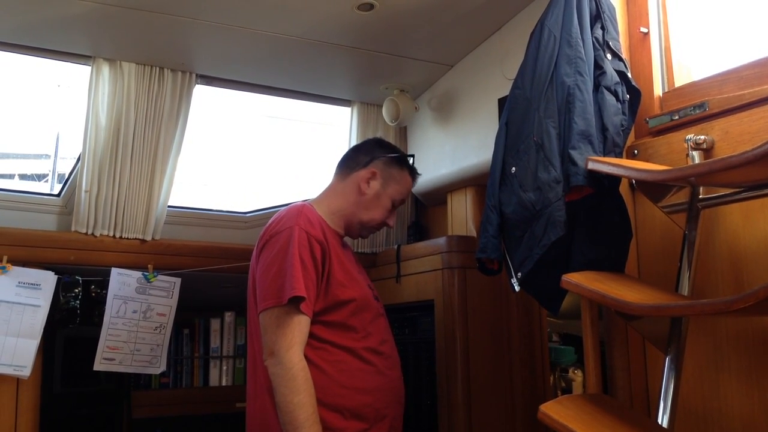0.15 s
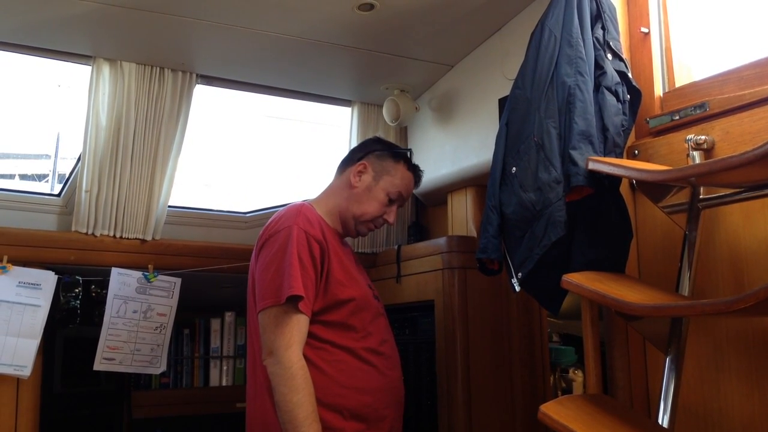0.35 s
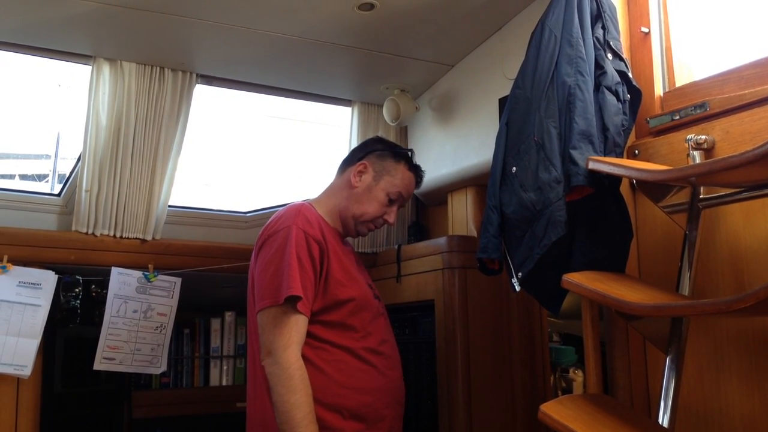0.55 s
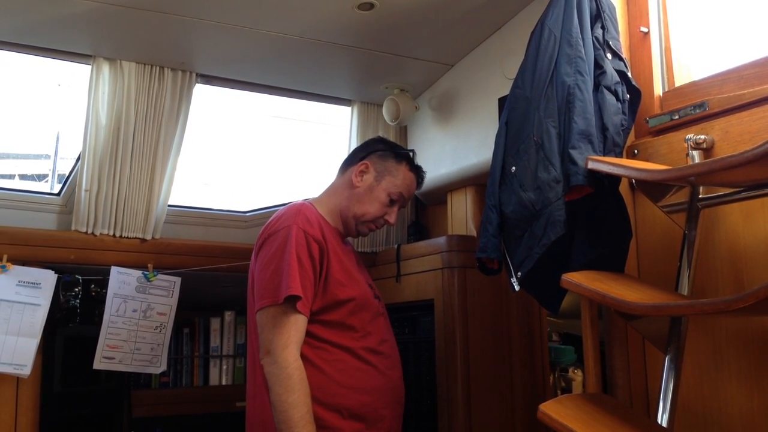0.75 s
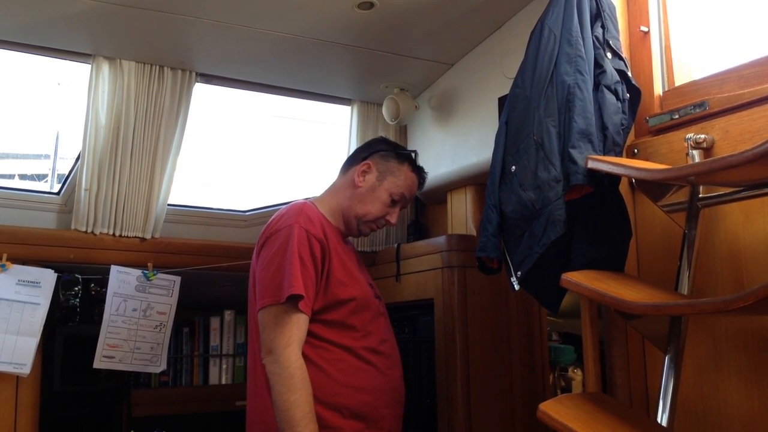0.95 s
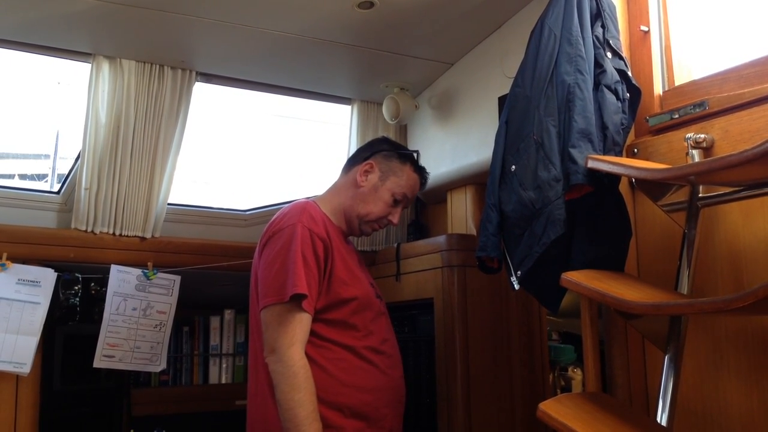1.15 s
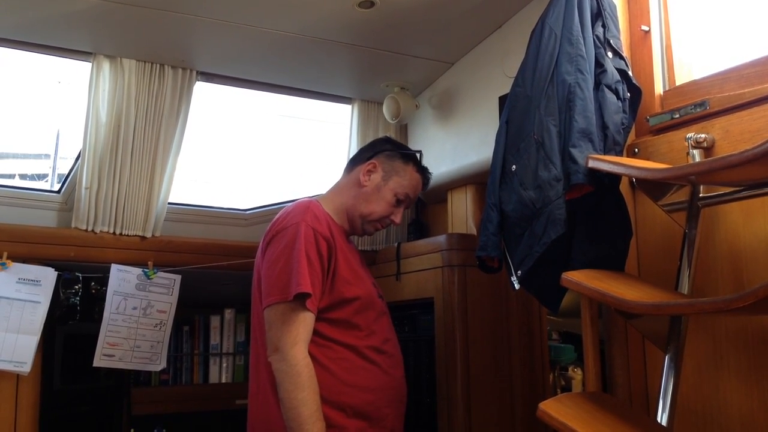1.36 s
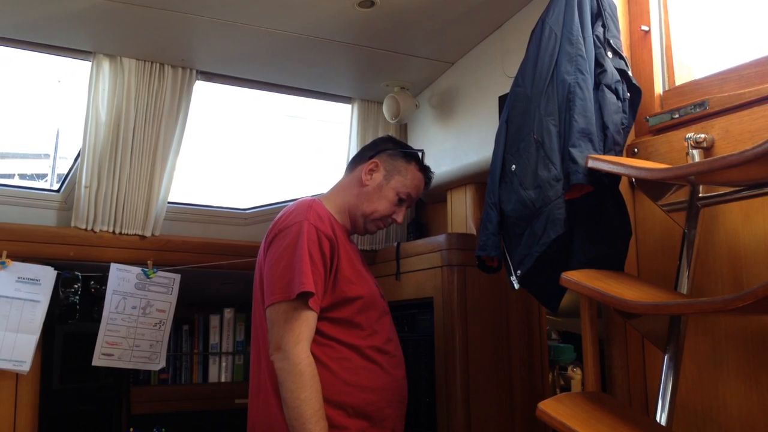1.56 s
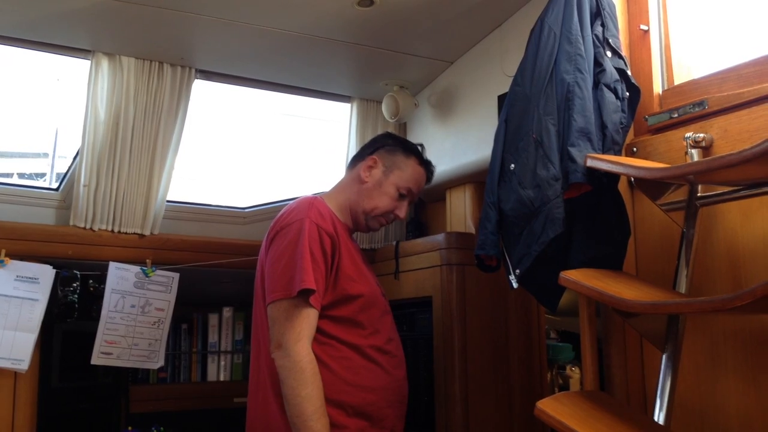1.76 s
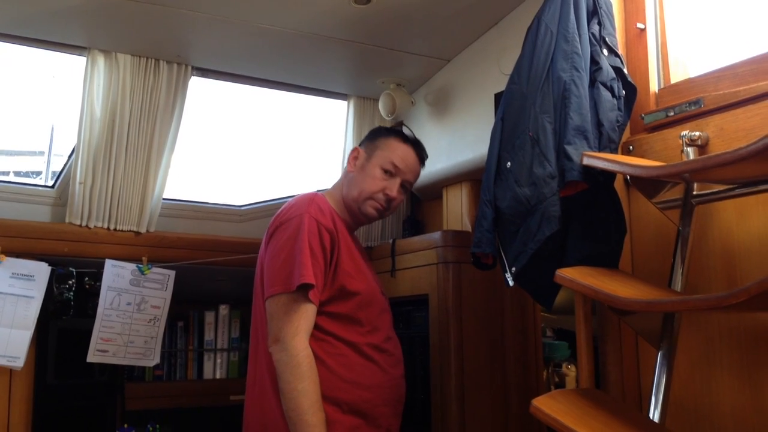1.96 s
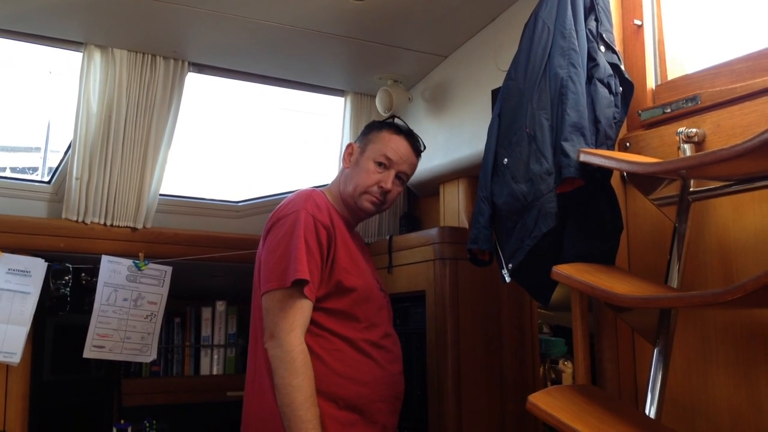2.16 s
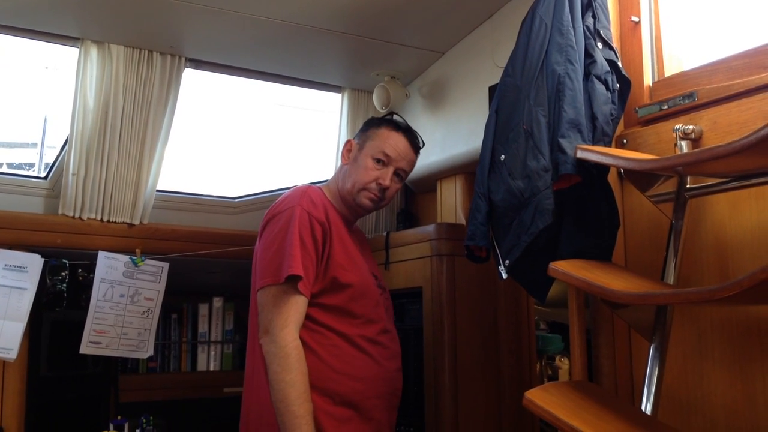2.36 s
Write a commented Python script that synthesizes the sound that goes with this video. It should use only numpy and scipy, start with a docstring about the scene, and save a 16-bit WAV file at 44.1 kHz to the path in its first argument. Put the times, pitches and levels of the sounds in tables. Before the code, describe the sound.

A boat's electric starter winds up and chatters with fast metallic clacks, failing to catch.

```python
"""A starter motor fails to catch.

One microphone inside a small wooden cabin, near enough for the direct sound to lead the echoes.
A switch clicks, a relay snaps, the pinion slams in and the motor winds up with a rough whine.
Then the pinion chatters against the gear ring, each blow ringing the metal and thudding in the hull,
until it is let go and coasts out with a faint hiss. A low lumpy rumble lies under it all."""
import sys
import numpy as np
from scipy import signal
from scipy.fft import rfft, irfft
from scipy.io import wavfile
from scipy.ndimage import uniform_filter1d

SR = 44100
rng = np.random.default_rng(int(sys.argv[2]) if len(sys.argv) > 2 else 0)


def to_wav(s):
    """Save 16-bit WAV."""
    ch = np.atleast_2d(s).T  # columns
    pcm = np.round(np.clip(ch, -1, 1) * 32767)  # PCM
    wavfile.write(sys.argv[1], SR, pcm.astype(np.int16))


N = 105840

# Spectra of the hull's rumble, the soft mid noise above it and the coasting pinion's hiss.
# Each row: frequency in Hz, relative level in dB.
RUMBLE_COLOUR = [(18, -33), (30, -4), (64, 5.5), (172, 2.5), (211, 4.5), (344, -24), (400, -34),
                 (520, -62.5), (880, -120)]
AIR_COLOUR = [(150, -45), (250, -24), (346, -4), (473, -18.5), (678, -16), (4000, -39), (5200, -69),
              (8800, -120)]
COAST_COLOUR = [(530, -37), (900, -1), (1050, -8), (1300, -3), (1980, -11), (2330, -3), (2790, -8.5),
                (3800, 0), (6650, -11), (12100, -12), (15500, -13.5)]
# Loudness of the mid noise and of the coasting hiss. Each row: time in seconds, level in dB.
AIR_LEVEL = [(0, -66.5), (.2, -58.5), (1.9, -61), (2.1, -64.5), (2.16, -62), (2.4, -64)]
COAST_LEVEL = [(1.74, -35), (1.784, -47), (1.892, -54), (1.99, -85)]
# The cabin's echo. Each row: frequency in Hz, seconds to fall 60 dB.
CABIN_DECAY = [(300, 0.41), (1000, 0.12), (4000, 0.037), (12000, 0.058)]
# The switch. Each row: time in seconds, relative level in dB, ring in Hz, low knock in dB.
SWITCH_CLICKS = [(0.0084, -40.5, 4830, -52.5), (0.064, -40.5, 3820, -53), (0.115, -41.5, 3730, -54),
                 (0.1697, -33.5, 3800, -53.5)]
# The whine's tones. Each row: multiple of the base pitch, width of its fuzz in Hz.
WHINE_ORDERS = [(0.998, 16), (1.64, 18.4), (3.01, 90)]
# The wind-up. Each row: time in seconds, base pitch in Hz, then the level of each tone in dB.
WIND_UP = [(0.339, 923, -44, -37, -57.5), (.41, 956, -31.5, -44, -80), (.46, 1010, -55, -55, -51),
           (.53, 1157, -67, -34, -42), (.575, 1145, -40, -49, -32.5), (.63, 1119, -39.5, -42, -27),
           (.665, 1117, -29, -27.5, -44), (.7, 1090, -42, -39, -43)]
# The motor's run. Each row: time in seconds, gain in dB, load from 0 (winding up) to 1 (chattering).
MOTOR_RUN = [(.2, -52, 0), (.23, -20, 0.86), (.3, -27, 0.67), (.39, -34.5, 0.055), (.47, -30, 0.18),
             (.58, -28, 0.19), (.67, -28.5, 0.28), (.74, -30, 0.53), (.8, -25.5, 0.9), (1.0, -27.5, 0.89),
             (1.35, -28, 0.91), (1.7, -27, 1), (1.73, -31, 0.76), (1.78, -61, 1)]
# Resonances of the motor housing. Each row: frequency in Hz, width in Hz, relative level in dB.
HOUSING_HUMS = [(628, 49, -19), (716.3, 54, -17), (975, 90, -24), (2100, 70, -24), (2304, 60, -26),
                (2630, 40, -22), (3000, 40, -27), (3255, 160, -19.5), (3780, 200, -15)]
# Spectra of the motor winding up, the motor under load and the crack of a blow.
# Each row: frequency in Hz, relative level in dB.
WINDING_COLOUR = [(240, -49.5), (400, -16.5), (560, -30), (705, -3), (784, -9), (1130, -5.5), (1260, -5.5),
                  (2800, -6.5), (3460, -6), (8530, -22.5), (11200, -14), (15500, -46.5)]
LOADED_COLOUR = [(180, -29), (300, -4), (476, -13), (720, -3), (1030, -10.5), (1700, -10), (2300, -5),
                 (2800, -8.5), (3340, -2.5), (5000, -5), (5800, -8.5), (7800, -4), (10100, -16.5),
                 (11700, -12.5), (15500, -19.5)]
CRACK_COLOUR = [(300, -31), (800, -11.5), (1500, -11), (2500, -4), (4300, -0.5), (5700, -6.5), (7800, -7),
                (10000, -13), (12000, -11), (15500, -19.5)]
# Parts that ring when struck; the rebound is the casing under a lighter second touch.
# Each row: frequency in Hz, relative level in dB, seconds to fall 60 dB.
HULL_MODES = [(166.9, -9, 0.28), (207.4, 1.5, 0.086), (350, -6.5, 0.25)]
RELAY_MODES = [(1743, -8.5, 0.018), (3026, -8, 0.0056), (4100, -8.5, 0.007), (6008, 3, 0.0065)]
CASING_MODES = [(2148, 8, 0.036), (2293, 4, 0.061), (2445, -4, 0.068), (2618, -2.5, 0.078)]
REBOUND_MODES = [(2324, 2, 0.072), (2600, -5.5, 0.022), (3260, 1.5, 0.014), (3645, -2.5, 0.018)]
BLOCK_MODES = [(727, -6.5, 0.035), (980, -5.5, 0.034), (1208, -8.5, 0.036), (1558, 3.5, 0.043),
               (1780, 2.5, 0.027), (1877, 6.5, 0.02)]
TOOTH_MODES = [(3318, -3, 0.055), (3480, -13.5, 0.045), (3684, -2.5, 0.03), (3890, -5, 0.045),
               (4390, -6, 0.024), (4680, -5, 0.019), (4940, -5.5, 0.028), (5220, -6, 0.043),
               (6650, -3.5, 0.031), (7570, -5.5, 0.025), (8830, -3, 0.022)]
# The pinion's blows. Each row: time in seconds, then relative levels in dB of the crack, the casing,
# the teeth and the block (these two added to the crack's), and the hull thud.
PINION_BLOWS = [(0.2152, -16, -18, -11, -16, -56), (0.2265, -10, -6.5, -13, -45, -40),
                (0.2605, 0, -18, -22, -7, -29.5), (0.3223, -8, -10.5, -28, -13, -32.5),
                (0.7088, -8.5, -14.5, -19, -6, -36.5), (0.7557, -6, -7, -21, -50, -32),
                (0.797, -5, -15, -29, -12.5, -31), (0.832, -12, -7.5, -13, -35, -32),
                (0.867, -6, -14.5, -13, -14, -32), (0.9079, -4, -10, -17, -14.5, -29.5),
                (0.945, -3.5, -11, -32, -17, -36.5), (0.9838, -12.5, -13.5, -2.5, -9.5, -31),
                (1.0188, -13.5, -21, 0.5, -27, -32), (1.056, -11, -12, -5.5, -35, -34.5),
                (1.0954, -7.5, -11, -30, -17, -33.5), (1.1336, -10.5, -18, -3, -12.5, -34.5),
                (1.1688, -8, -21, -10.5, -15, -32), (1.206, -14.5, -15.5, 2.5, -25, -35.5),
                (1.245, -10.5, -19.5, -3, -25, -32.5), (1.2817, -10, -17, -8, -27, -32.5),
                (1.3178, -15.5, -21, 2.5, -12, -33), (1.3555, -15, -14.5, 1.5, -14, -34),
                (1.3929, -7, -20, -18, -19.5, -33), (1.4311, -7, -21, -8, -15, -33.5),
                (1.4677, -14, -18, 0.5, -15.5, -30.5), (1.5028, -8, -22.5, -37, -13, -39),
                (1.5392, -14.5, -19, -1, -12.5, -32), (1.58, -9.5, -16.5, -8, -35, -30.5),
                (1.6121, -11, -17.5, -2.5, -11, -32), (1.6499, -12.5, -18, -1.5, -34.5, -33),
                (1.686, -10.5, -16, -2, -37, -29)]


def amp(db):
    """Decibels to gain."""
    return 10 ** (np.asarray(db) / 20)


def unit_rms(x):
    """Scales to rms 1."""
    return x / np.sqrt(np.mean(x ** 2) + 1e-20)


def at_hz(points, hz):
    """Reads a table on a log-frequency axis."""
    f, value = np.transpose(points)
    return np.interp(np.log(hz + 1), np.log(f + 1), value)


def track(rows, column=1):
    """One column of a time table, at every sample."""
    rows = np.array(rows)
    return np.interp(np.arange(N) / SR, rows[:, 0], rows[:, column])


def gate(rows, fade_s):
    """Fades in from a table's first time and out to its last."""
    t = np.arange(N) / SR
    return np.clip(np.minimum(t - rows[0][0], rows[-1][0] - t) / fade_s, 0, 1)


def highpass(x, hz):
    """Steep bass cut."""
    return signal.sosfilt(signal.butter(4, hz, "high", fs=SR, output="sos"), x)


def coloured(x, points):
    """Gives a signal a spectrum; rms 1."""
    gain = amp(at_hz(points, np.fft.rfftfreq(N, 1 / SR)))
    return unit_rms(irfft(rfft(x) * gain, N))


def grit(per_s, spread_db):
    """Tiny random contacts of uneven size and sign; rms 1."""
    size = amp(spread_db * np.minimum(rng.exponential(1, N), 5)) * rng.choice([-1., 1.], N)
    return unit_rms(size * (rng.random(N) < per_s / SR))


def resonate(x, hz, width_hz):
    """A resonance of gain 1 that can follow a pitch curve."""
    turn = np.exp(2j * np.pi * np.cumsum(hz * np.ones(N)) / SR)
    pole = np.exp(-np.pi * width_hz / SR)
    return 2 * (turn * signal.lfilter([1 - pole], [1, -pole], x / turn)).real


def strikes(times, levels_db):
    """One impulse at each time."""
    train = np.zeros(N)
    train[np.round(np.array(times) * SR).astype(int)] = amp(levels_db)
    return train


def bursts(times, levels_db, rise_s, t60):
    """Envelope with a quick rise and a decay at each time."""
    t = np.arange(SR // 4) / SR
    shape = np.minimum(t / rise_s, 1) * amp(-60 * t / t60)
    return np.abs(signal.fftconvolve(strikes(times, levels_db), shape)[:N])


def ring(x, modes, swell_s=1e-4):
    """Drives a set of dying modes."""
    t = np.arange(SR // 4) / SR
    tap = sum(amp(db - 60 * t / t60) * np.sin(2 * np.pi * hz * t) for hz, db, t60 in modes)
    return signal.fftconvolve(x, tap * np.minimum(t / swell_s, 1))[:N]


def rumble():
    """The room tone: low lumpy noise of the hull, soft mid noise and a thin hiss."""
    lump = int(0.013 * SR)
    lumps_db = unit_rms(uniform_filter1d(uniform_filter1d(rng.standard_normal(N), lump), lump))
    low = unit_rms(coloured(rng.standard_normal(N), RUMBLE_COLOUR) * amp(lumps_db))
    air = amp(track(AIR_LEVEL) + lumps_db) * coloured(rng.standard_normal(N), AIR_COLOUR)
    hiss = signal.lfilter([.6], [1, -.4], rng.standard_normal(N))
    return amp(-51.5) * low + air + amp(-69) * hiss


def cabin(x):
    """The direct sound plus sparse echoes off the wooden walls, each band dying at its own speed."""
    taps = np.zeros(SR // 2)
    slots = np.arange(130, SR // 2 - 20, 20)
    taps[slots + rng.integers(0, 20, len(slots))] = rng.choice([-1., 1.], len(slots))
    hz, t, bands = signal.stft(taps, SR, nperseg=256)
    decay = amp(-60 * t / at_hz(CABIN_DECAY, hz)[:, None])
    tail = signal.istft(bands * decay, SR, nperseg=256)[1]
    echoes = signal.fftconvolve(x, tail / np.linalg.norm(tail))[:N]
    return x + amp(-6) * highpass(echoes, 601)


def mount_boom():
    """The mounts take the hardest slam with a slow low boom."""
    hz, db, t60 = 109, -29, .3
    return ring(strikes([.262], [0]), [(hz, db, t60)], swell_s=.03)


def hull_thuds():
    """Each blow reaches the hull as a soft push and sets its low panels humming."""
    push_s, lead_s = 0.0016, 0.0037
    times, thud_db = np.transpose(PINION_BLOWS)[[0, -1]]
    push = np.hanning(int(push_s * SR) + 3)
    pushes = signal.fftconvolve(strikes(times - lead_s, thud_db), push / push.sum())[:N]
    return highpass(ring(pushes, HULL_MODES), 124)


def pinion_coast():
    """A faint hiss while the freed pinion spins down."""
    hiss = coloured(rng.standard_normal(N), COAST_COLOUR)
    return gate(COAST_LEVEL, fade_s=0.022) * amp(track(COAST_LEVEL)) * hiss


def switch_clicks():
    """The switch makes small bright clicks, each with its own short ring and a low knock."""
    knock_mode = (527, 3, .08)  # Hz, dB, seconds to fall 60 dB
    bright_noise = signal.lfilter([1, -.5], [1], rng.standard_normal(N))
    out = np.zeros(N)
    for s, db, ring_hz, knock_db in SWITCH_CLICKS:
        puff = bursts([s - .002], [db - 20], rise_s=0.0079, t60=0.08) * bright_noise
        out += puff + 2 * amp(13) * resonate(puff, ring_hz, width_hz=440)
        out += ring(strikes([s], [knock_db]), [knock_mode])
    return out


def relay():
    """The relay snaps shut and its contacts ring briefly."""
    snap = bursts([0.1875], [0], rise_s=0.011, t60=.04) * rng.standard_normal(N)
    return amp(-30) * ring(snap, RELAY_MODES) + amp(-21) * highpass(snap, 1400)


def motor_whine(clean_share=0.73):
    """Motor tones, part clean and part fuzzy, that climb as it winds up and then sag a little."""
    pitch_hz = track(WIND_UP)
    turns = np.cumsum(pitch_hz) / SR
    out = np.zeros(N)
    for i, (order, width_hz) in enumerate(WHINE_ORDERS):
        tone = np.sqrt(2) * np.sin(2 * np.pi * order * turns)
        fuzz = unit_rms(resonate(rng.standard_normal(N), order * pitch_hz, width_hz))
        out += amp(track(WIND_UP, column=2 + i)) * (clean_share * tone + (1 - clean_share) * fuzz)
    return gate(WIND_UP, fade_s=0.0089) * out


def motor_grind(grit_share=0.36):
    """Brush and gear grit heard through the housing; load shifts the colour and adds a high sizzle."""
    load = track(MOTOR_RUN, column=2)
    drive = grit_share * grit(per_s=6000, spread_db=4.5) + (1 - grit_share) * rng.standard_normal(N)
    body = (1 - load) * coloured(drive, WINDING_COLOUR) + load * coloured(drive, LOADED_COLOUR)
    hums = sum(amp(db) * unit_rms(resonate(drive, hz, width)) for hz, width, db in HOUSING_HUMS)
    sizzle = amp(-16) * unit_rms(resonate(drive, hz=11780, width_hz=130))
    body += (0.32 + 0.55 * load) * hums + load ** 2 * sizzle
    return gate(MOTOR_RUN, fade_s=0.0068) * amp(track(MOTOR_RUN)) * highpass(body, 250)


def casing_clanks():
    """Each blow knocks the starter casing once, then touches it again more lightly."""
    swell_s, rebound_s = 0.0025, 0.013
    times, _, casing_db = np.transpose(PINION_BLOWS)[:3]
    polarity = rng.choice([-1., 1.], N)
    knock = ring(polarity * strikes(times - swell_s / 2, casing_db - 6), CASING_MODES, swell_s)
    rebound = ring(polarity * strikes(times + rebound_s, casing_db - 12.5), REBOUND_MODES, swell_s)
    return highpass(knock + rebound, 331)


def pinion_blows():
    """Each blow is a short scrape that cracks and rings the block and the teeth, which differ a little."""
    rise_s, t60 = 0.0028, 0.07
    tooth_kinds, detune, vary_db = 5, .015, 5
    times, crack_db, _, teeth_db, block_db, _ = np.transpose(PINION_BLOWS)
    starts = times - rise_s
    scrape = grit(per_s=16000, spread_db=0.85)
    out = amp(-9.5) * coloured(scrape, CRACK_COLOUR) * bursts(starts, crack_db, rise_s, t60)
    out += ring(scrape * bursts(starts, crack_db + block_db - 30.5, rise_s, .9 * t60), BLOCK_MODES)
    for kind, offsets in enumerate(rng.uniform(-0.88, 1, (tooth_kinds, len(TOOTH_MODES), 2))):
        modes = [(hz * (1 + detune * sharper), db + vary_db * louder, decay_s)
                 for (hz, db, decay_s), (sharper, louder) in zip(TOOTH_MODES, offsets)]
        hits = slice(kind, None, tooth_kinds)  # the kinds of tooth take turns
        push = bursts(starts[hits], crack_db[hits] + teeth_db[hits] - 27, rise_s, 0.61 * t60)
        out += ring(push * scrape, modes)
    return highpass(out, 331)


def scene():
    """All sources at one microphone, on both channels; only part of the clank feeds the echoes."""
    clanks, echo_share = casing_clanks(), 0.451
    mono = cabin(pinion_blows() + echo_share * clanks + switch_clicks() + relay() + motor_grind())
    mono += motor_whine() + (1 - echo_share) * clanks
    mono += hull_thuds() + mount_boom() + pinion_coast() + rumble()
    return np.array([mono, mono])


def record(dry):
    """The microphone's signal is cut steeply above 15.6 kHz."""
    lowpass = signal.firwin(801, 15600, window=("kaiser", 12), fs=SR)
    return signal.oaconvolve(dry, lowpass[None], "same")


dry = scene()
out = record(dry)
to_wav(out)
```